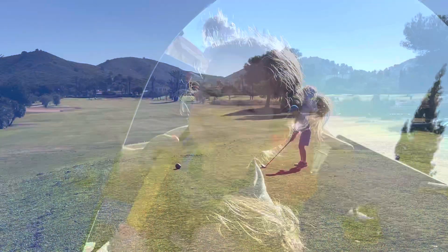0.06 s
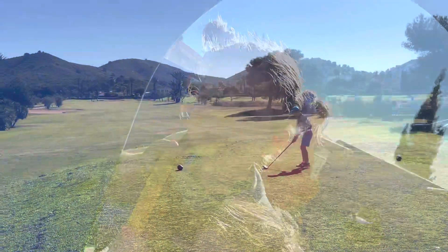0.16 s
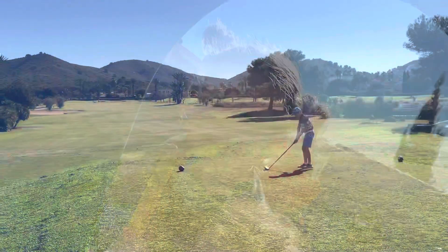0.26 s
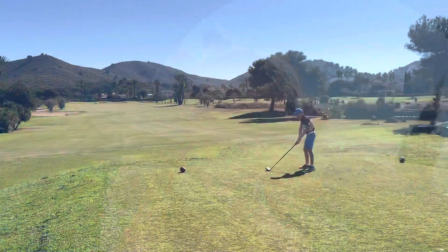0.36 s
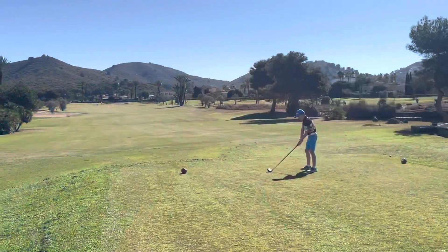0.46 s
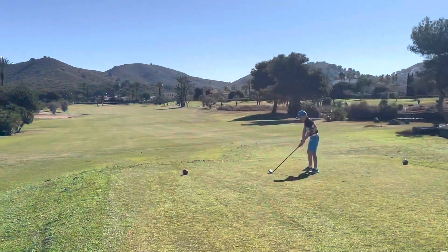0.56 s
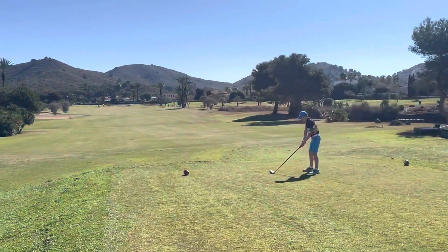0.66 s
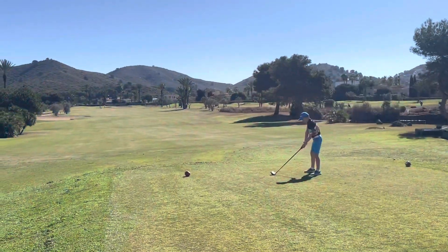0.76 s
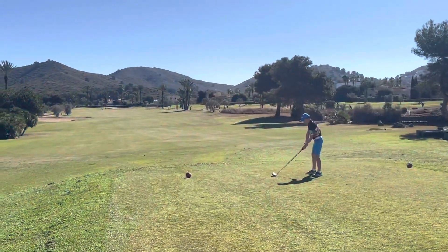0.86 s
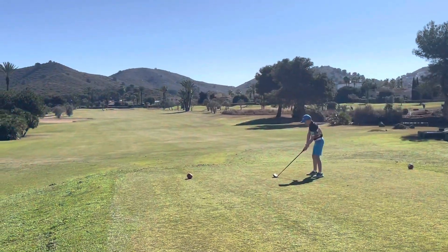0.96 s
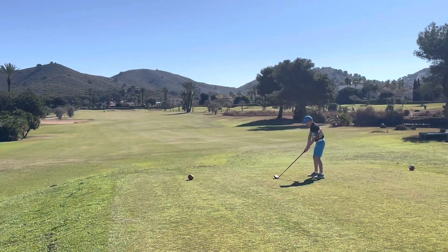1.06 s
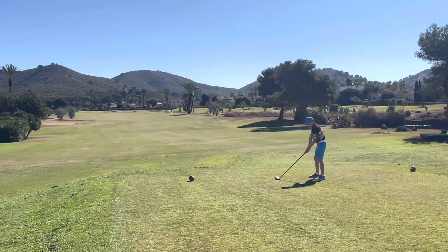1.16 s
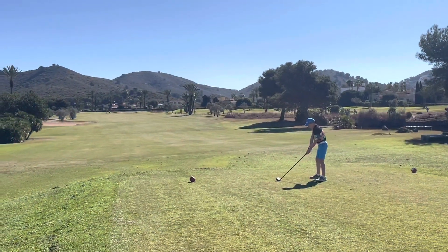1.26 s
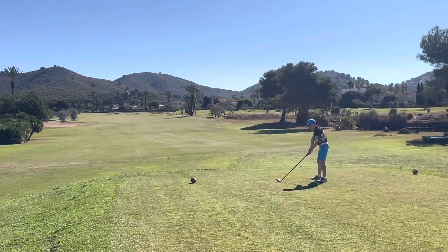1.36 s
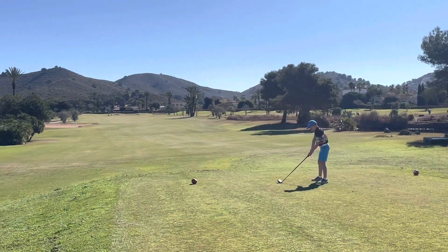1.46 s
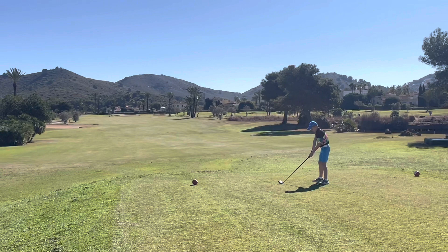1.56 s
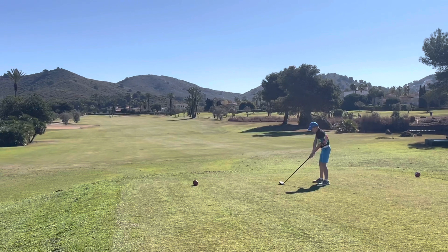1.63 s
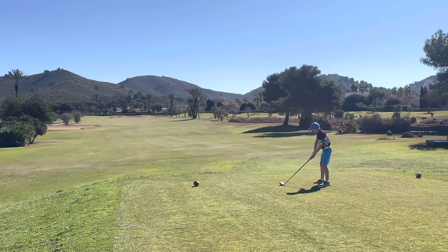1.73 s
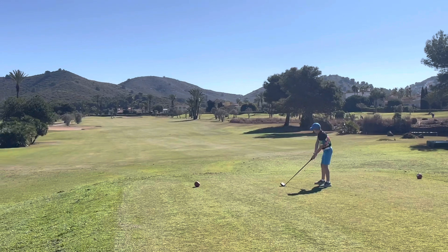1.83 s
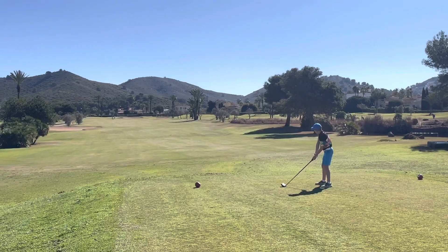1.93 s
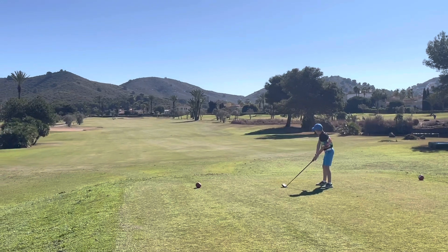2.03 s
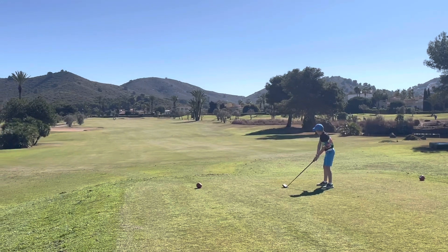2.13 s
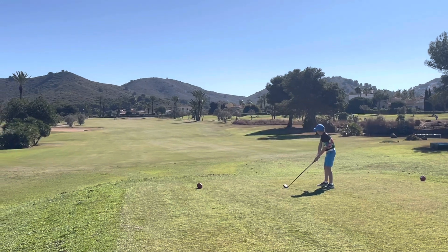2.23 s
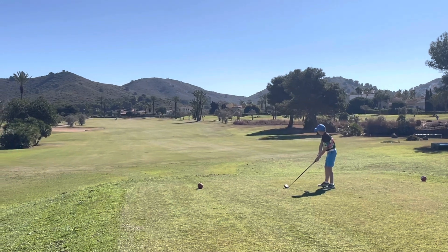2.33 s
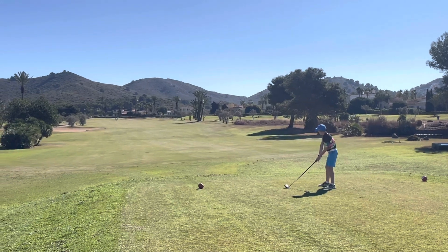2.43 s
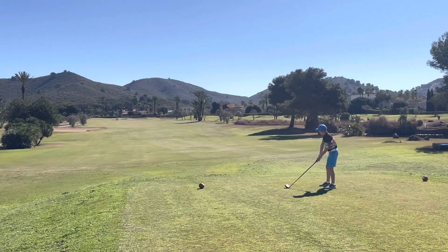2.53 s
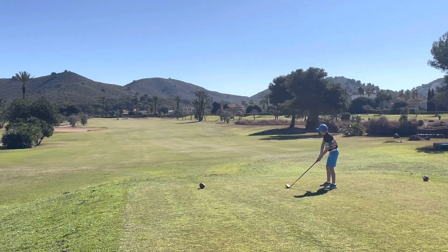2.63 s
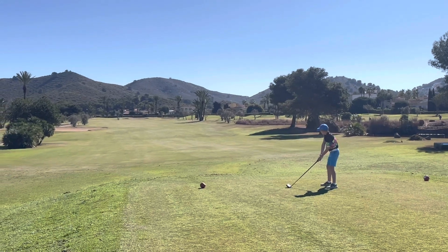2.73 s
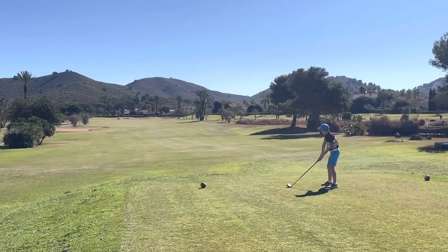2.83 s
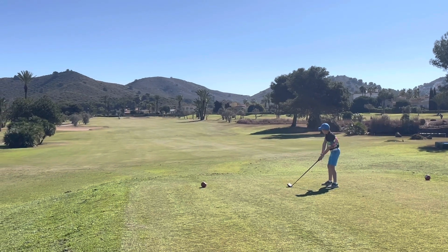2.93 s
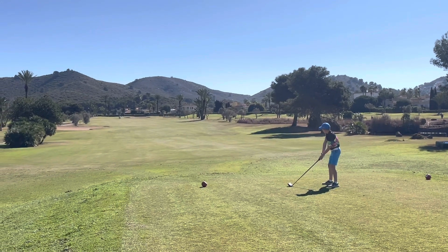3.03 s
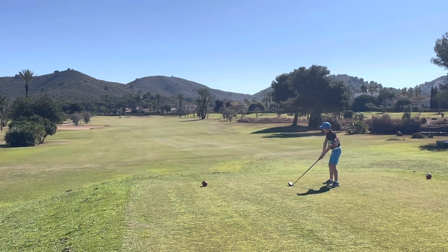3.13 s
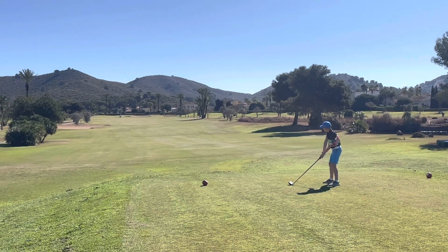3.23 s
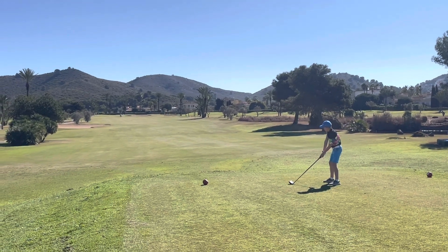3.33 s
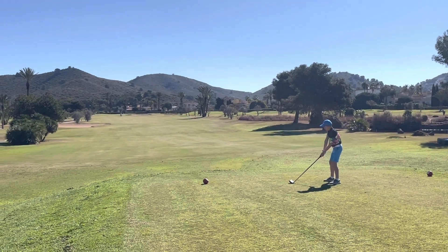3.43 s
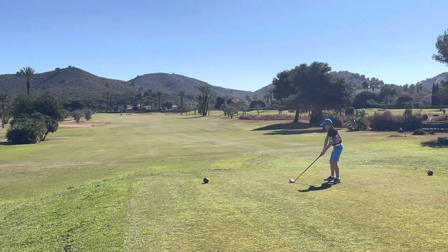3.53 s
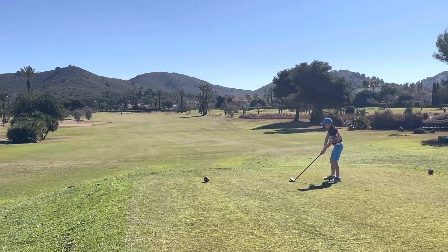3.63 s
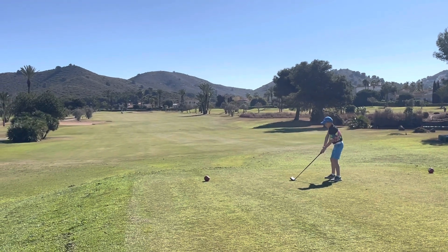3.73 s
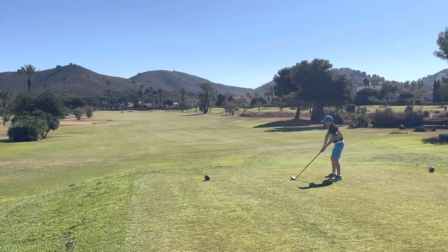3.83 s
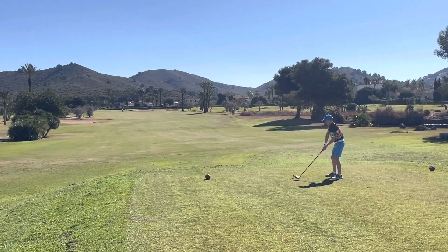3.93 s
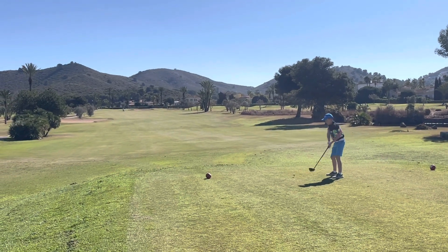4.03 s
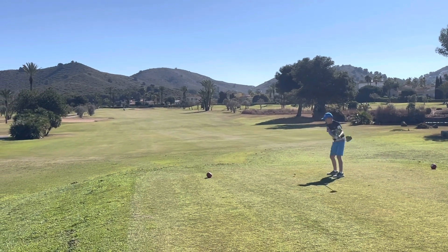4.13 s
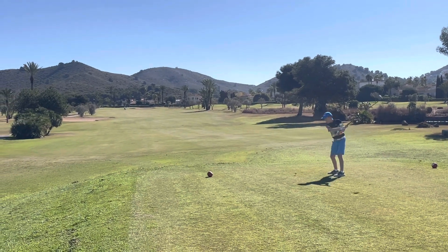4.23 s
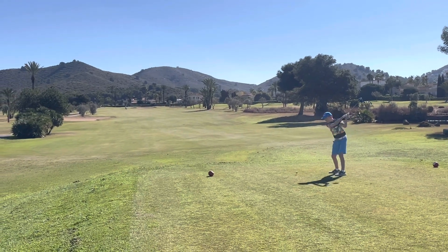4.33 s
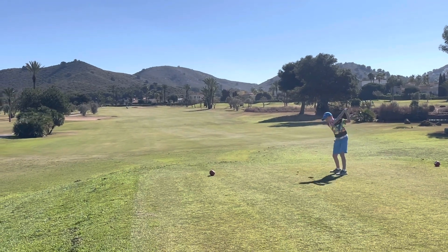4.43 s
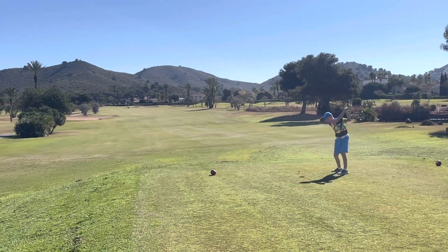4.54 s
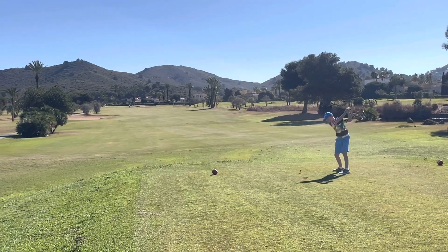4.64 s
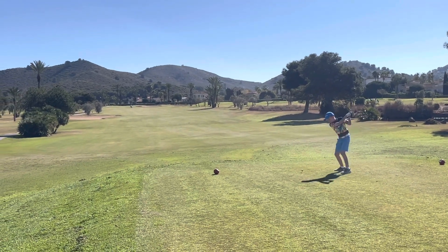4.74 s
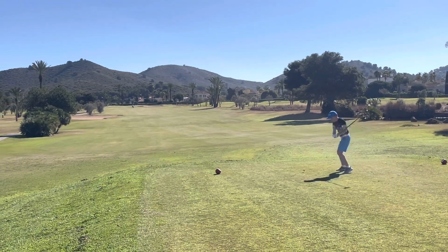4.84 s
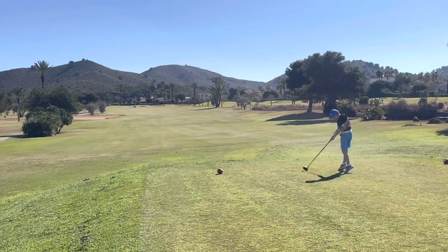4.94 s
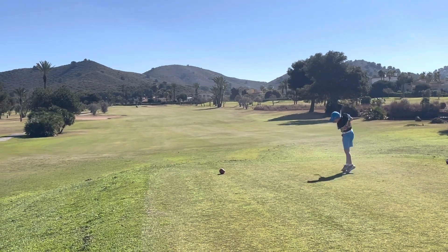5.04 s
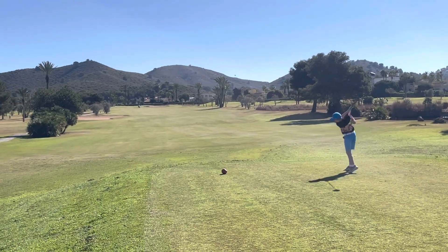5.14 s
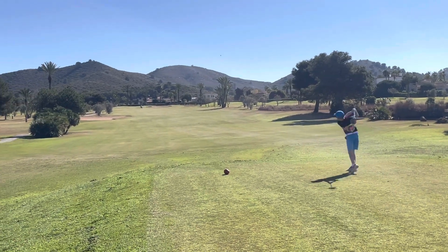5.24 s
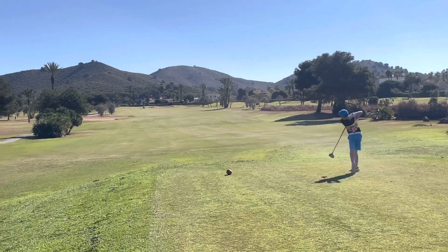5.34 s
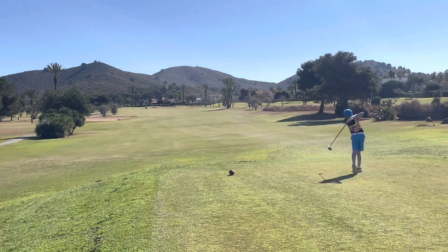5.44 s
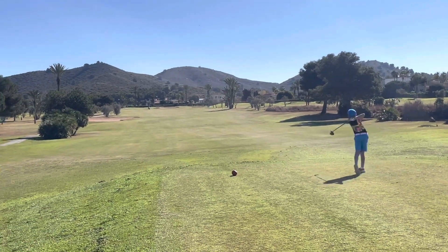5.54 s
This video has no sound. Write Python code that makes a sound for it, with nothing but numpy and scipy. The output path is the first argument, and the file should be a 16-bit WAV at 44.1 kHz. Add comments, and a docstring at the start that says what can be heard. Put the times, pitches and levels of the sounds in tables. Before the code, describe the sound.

On an open golf course, light wind rumbles and softly thumps on the microphone over rustling leaves, a distant mower and a faint machine hum. A nearby songbird whistles a rising, partly trilled tune while small birds chip farther off. Near the end, a metal driver swishes briefly and cracks a ball off the tee, with a short ring and faint echoes. The songbird then whistles again.

```python
"""On an open golf course, a metal driver swishes down and cracks a ball off a tee.
A brief metallic ring follows, and the trees send back echoes. A songbird whistles nearby,
small birds chip farther off, and a distant mower putters and whines over a machine hum.
Light wind buffets the two microphone openings (ports) over the leaves and the hush of the valley."""
import sys
import numpy as np
from scipy import signal
from scipy.fft import rfft, irfft, next_fast_len
from scipy.io import wavfile
from scipy.ndimage import uniform_filter1d, map_coordinates

SR = 44100
rng = np.random.default_rng(int(sys.argv[2]) if len(sys.argv) > 2 else 0)


def log_audio(samples):
    """Write samples as a 16-bit WAV file to the path given in sys.argv[1]."""
    # one column per channel
    frames = np.atleast_2d(samples).T
    # limit to full scale, then quantise
    limited = np.clip(frames, -1, 1)
    pcm = np.round(limited * 32767).astype(np.int16)
    wavfile.write(sys.argv[1], SR, pcm)


N = 246078
TIME = np.arange(N) / SR
SIDES = np.array([[1], [-1]])  # plus for left, minus for right
HIT_S, TICK_S = 4.9631, 4.819

# Face meets ball, then sole meets tee. Each row: seconds after the hit, level in dB, fade in seconds.
# A fade is always the time taken to drop by 60 dB.
TOUCHES = [(0, -14.5, 0.029), (.003, -17, 0.027)]
# Short tones that colour the knock and click of the hit, then the higher metallic ring.
# Each row: pitch in Hz, relative dB, fade in seconds.
HIT_TONES = [(235, -41, .06), (830, -28, .03), (1320, -29, .03), (2010, -28, .016), (2300, -27, .016),
             (2930, -25, .022), (3150, -41, .09), (3950, -21.5, .022), (4060, -41.5, .17),
             (4089, -41.5, .17), (4780, -43, .1), (5330, -33, .025), (5450, -39, .1), (5930, -23, .04),
             (6207, -41, .07), (6930, -23, .055), (7015, -18, .072), (7320, -22.5, .04), (7390, -31, .07),
             (8020, -28, .03), (9500, -29, .04), (10300, -26, .055), (10900, -32, .06), (11300, -27, .06),
             (11790, -32, .05), (12270, -35, .06), (13380, -33, .03), (14400, -37, .02)]
# A tiny metal tick, with the same columns.
TICK_TONES = [(10550, 2, .045), (10720, 0, .045), (12550, -5, .03), (14150, -4, .03), (14500, -5, .03)]
# The tone colour of five noises. Each row: frequency in Hz, relative strength in dB.
CRACK_COLOUR = [(900, -63), (2000, -10.5), (3400, -27.5), (4000, -4.5), (4600, -30), (5900, -10.5),
                (6500, -9.5), (7100, -6.5), (7700, -9), (8100, 1), (8800, -12), (10200, -6.5), (13500, -11),
                (15000, -17), (16400, -43)]
SWISH_COLOUR = [(3000, -32.5), (6000, -3), (8500, -10.5), (11500, -5.5), (14500, -21), (16000, -33.5)]
WIND_COLOUR = [(15, -49.5), (25, -13.5), (54, 0.5), (96, 1.5), (251, -13.5), (317, -19), (400, -20.5),
               (520, -35), (880, -120)]
LEAF_COLOUR = [(3500, -36.5), (5000, -7), (7000, -4), (7800, -10.5), (8500, -2.5), (9000, 4.5),
               (9600, -15.5), (11000, -8), (12500, -12), (13300, -35.5), (16000, -43)]
HUSH_COLOUR = [(120, -43), (250, -11.5), (450, -1), (700, -4), (1100, -9), (1500, -12.5), (2200, -10),
               (3100, -13), (4200, -17.5), (5500, -26), (6500, -60)]
# How the hit reaches the ports. Each row: frequency in Hz, dB by which the left is louder.
HIT_BALANCE = [(100, -15.5), (200, 15.5), (400, 1), (700, -5), (1300, 3), (2400, 0.5)]
# Each row: frequency in Hz, radians by which the left is ahead.
HIT_LEAD = [(200, 0), (500, .3), (750, -1.6), (1150, -.3), (2000, .1), (3300, .7), (5200, .6), (5800, -1.3),
            (7100, -1.2), (8300, -2.7), (10100, -4.2), (12200, -5.5), (14000, -6.3), (16000, -7)]
# Echoes from trees and slopes. Each row: delay in seconds, relative dB, fade in seconds.
ECHOES = [(0.024, -29, .01), (0.033, -28, .008), (0.07, -38, .02), (0.117, -33, .05), (.181, -43, .012),
          (0.203, -42.5, .04), (.24, -45.5, 0.061)]
# What air and foliage give back. Each row: frequency in Hz, gain in dB.
ECHO_COLOUR = [(100, -15.5), (500, -8.5), (1300, -8), (2200, -15), (4100, 2), (5300, 0), (5900, 1.5),
               (6800, -1), (7500, -12), (10000, -13.5), (12000, -8.5), (14000, -39)]
# The songbird's tune. Each row is one note, made of points: time in seconds, pitch in Hz.
NOTE_PITCHES = [
    [(.55, 1980), (.61, 2010)],
    [(.62, 2510), (.65, 2420), (.675, 2140), (.76, 2120)],
    [(.915, 2380), (.931, 2460), (.959, 2704), (.977, 2490), (.995, 2100)],
    [(1.04, 2270), (1.092, 2386), (1.178, 2500), (1.19, 2370)],
    [(1.37, 1920), (1.392, 2030), (1.418, 2131), (1.456, 2135), (1.5, 2050), (1.53, 2090)],
    [(1.555, 2323), (1.569, 2375), (1.635, 2460), (1.669, 2633), (1.7, 2640), (1.73, 2550)],
    [(1.92, 1940), (1.994, 2125), (2.08, 2166)],
    [(2.165, 2310), (2.183, 2374), (2.255, 2443), (2.325, 2630), (2.385, 2650)],
    [(2.52, 2840), (2.578, 2924), (2.592, 2720)],
    [(2.6, 2930), (2.61, 3020), (2.624, 3000), (2.637, 2870), (2.657, 3142), (2.683, 3150), (2.7, 3400),
     (2.72, 3400)],
    [(2.735, 3380), (2.775, 3570)],
    [(2.805, 2820), (2.863, 2860), (2.877, 2945), (2.9, 3100), (2.915, 3060), (3.0, 3400)],
    [(3.035, 3520), (3.09, 3610)],
    [(5.13, 2684), (5.156, 2540), (5.168, 2351)],
    [(5.172, 2520), (5.18, 2530), (5.21, 2530), (5.276, 2915), (5.31, 3170)],
    [(5.31, 3050), (5.342, 2880), (5.428, 2517), (5.526, 2308), (5.58, 2260)],
]
# The same notes. Each row: start dB, place of the peak (0 to 1), peak dB, end dB,
# place where the trill starts (0 to 1), trill pulses a second.
NOTE_SHAPES = [(-64, .6, -63, -59, 1, 0), (-51, 0, -49.5, -72, 0, 55.5), (-58, 0.58, -48.5, -61, 1, 0),
               (-55.5, 0.9, -46.5, -54, 0.9, -3), (-58, 0.2, -61, -65, 0.9, 3),
               (-54, 0.46, -45, -54.5, 0.92, 3), (-64, 0.5, -62, -64, 0.9, 1),
               (-55.5, 0.5, -45.5, -54.5, 0.93, 1), (-56.5, 0.67, -46, -59, 1, 0),
               (-52, 0.3, -52, -57, 0.47, 106.5), (-66, .6, -58, -62, 0.1, 109),
               (-61, 0.11, -49, -66, 0.73, 98), (-66, 0.6, -57.5, -55, 0.13, 98),
               (-54, 0.7, -50.5, -39, 1, 0), (-43.5, 0.62, -47, -70, 1, 0),
               (-56.5, 0.35, -46.5, -60.5, 0.96, 0)]
# Small birds. Each row: start and length in seconds, first, middle and last pitch in Hz,
# level in dB, trill pulses a second.
CHIPS = [(.146, .024, 4000, 5300, 5850, -68, 0), (.168, .024, 5500, 5450, 5200, -59, 0),
         (.19, .016, 5100, 4500, 3800, -67, 0), (.236, .034, 3100, 3750, 4750, -65, 0),
         (.27, .013, 4400, 3950, 3600, -66, 0), (.29, .025, 4500, 4100, 3500, -71, 0),
         (.44, .016, 5000, 5300, 5600, -77, 0), (.578, .014, 4900, 5200, 5500, -77, 0),
         (.648, .016, 4700, 5100, 5600, -74, 0), (.726, .014, 4900, 5300, 5700, -76, 0),
         (.81, .012, 5100, 5300, 5600, -78, 0), (.856, .012, 6250, 6450, 6650, -75, 0),
         (.915, .03, 4000, 3850, 3700, -69, 0), (.286, .03, 3400, 3100, 2750, -59.5, 0),
         (.286, .034, 2300, 2050, 1800, -60, 0), (.512, .022, 3200, 3800, 4400, -68, 0),
         (.533, .022, 4550, 4650, 4600, -70, 0), (.563, .022, 3250, 3350, 3200, -63, 0),
         (.828, .013, 3500, 3700, 3900, -66, 0), (.876, .04, 4850, 4650, 4430, -60, 0),
         (1.226, .02, 5800, 5550, 5400, -67, 0), (1.24, .035, 5500, 5400, 5050, -63, 0),
         (1.31, .04, 4300, 4700, 5200, -70, 0), (2.03, .025, 5000, 4700, 4300, -68, 0),
         (2.362, .085, 6250, 6050, 6250, -64, 85), (2.577, .03, 5700, 6600, 6750, -73, 0),
         (2.662, .012, 5800, 6150, 6500, -73, 0), (2.673, .02, 6580, 6620, 6600, -70, 0),
         (2.72, .026, 4600, 5200, 5800, -74, 0), (2.745, .022, 5800, 5950, 6050, -71, 0),
         (3.59, .1, 7300, 7250, 7250, -76, 70), (4.555, .03, 5900, 5650, 5300, -72, 0),
         (4.6, .02, 4300, 4500, 4900, -73, 0)]
# The steady breeze. Each row: time in seconds, level in dB.
BREEZE = [(0.0, -53.5), (0.15, -54), (1.96, -51.5), (2.5, -54), (4.41, -52.5), (4.77, -54.5), (5.58, -45)]
# Gusts. Each row: time in seconds, peak dB, half length in seconds, dB more on the left.
GUSTS = [(.01, -54, 0.036, -1), (0.234, -51.5, 0.04, -4), (0.44, -55, 0.011, -4), (0.596, -49.5, 0.055, -2),
         (0.718, -51.5, 0.053, -6), (0.861, -47.5, 0.012, -1), (0.957, -52, 0.017, -4), (1.1, -50, 0.12, 3),
         (1.256, -49, 0.047, 3), (1.498, -48, 0.0088, 16), (1.558, -50, 0.022, -8), (1.72, -59, .03, 1),
         (1.88, -49.5, 0.056, -3), (2.04, -49.5, 0.03, -2), (2.196, -44, 0.02, -2),
         (2.494, -51.5, 0.12, -1), (2.827, -48, 0.041, -3), (3.06, -50.5, 0.045, 2),
         (3.236, -49.5, 0.092, 2.5), (3.346, -43, 0.026, 2.5), (3.613, -46, 0.013, 1),
         (3.779, -49, 0.018, 3), (3.89, -48.5, 0.069, -1), (4.05, -48, 0.094, 4), (4.308, -45, 0.029, 2),
         (4.488, -45, 0.072, -1), (4.683, -46.5, 0.023, 1), (4.773, -45, 0.012, -4), (4.99, -49, 0.083, -4),
         (5.18, -53, 0.018, 0.5), (5.289, -49, 0.028, 5), (5.393, -53, 0.048, 5), (5.507, -56, 0.045, 1)]
# Single swirls of air that thump a port.
# Each row: time in seconds, peak dB, dB more on the left, pitch in Hz, half length in seconds.
THUMPS = [(0.445, -43, 1, 70, .01), (0.583, -41, 2, 80, 0.0075), (0.593, -48, -1, 203, 0.0025),
          (0.839, -45.5, 1, 203, 0.0051), (.853, -39, -1, 72, 0.0075), (.955, -46, -1, 75, .016),
          (1.072, -41.5, 0, 68, .014), (1.109, -45, -1, 203, 0.0039), (1.13, -43, -7, 62, 0.0086),
          (1.166, -42.5, -1, 62, 0.011), (1.223, -42, -.5, 203, 0.0029), (1.232, -44, 0, 85, 0.017),
          (1.72, -50, 1.5, 203, 0.0041), (3.243, -42.5, 4, 96.5, 0.027), (3.347, -41.5, -1, 68, 0.021),
          (3.353, -41, -3, 203, 0.003), (4.104, -41.5, 0, 203, 0.0049), (4.311, -42, -3, 99, 0.014),
          (4.315, -41.5, -1, 203, .0034), (4.627, -44.5, -2, 203, 0.0039), (5.038, -42, -2, 150, 0.0062),
          (5.085, -45, -3, 203, 0.0049), (5.289, -48, 3, 96, 0.019)]
# Far sounds. Each row: time in seconds, then dB of hush, putter, leaves, low hum and high hum.
FAR_LEVELS = [(0, -64.5, -72, -83, -72.5, -80), (.6, -60.5, -73.5, -79.5, -72, -93),
              (1.3, -60.5, -68.5, -76.5, -72.5, -87), (2, -58.5, -67, -73.5, -71, -89),
              (2.6, -58.5, -75, -75.5, -67, -75), (3.7, -58, -72.5, -76, -68.5, -78),
              (4.85, -57, -72, -76.5, -68.5, -71.5), (5.05, -56, -65, -73.5, -73.5, -68),
              (5.58, -56, -69, -72, -61.5, -63.5)]
# Where the mower's casing, its blades and a far machine's hum ring.
# Each row: pitch in Hz, width in Hz, relative dB.
CASING_BANDS = [(1769, 63, 4), (907, 280, -16.5)]
BLADE_BANDS = [(2680, 240, -3), (3514, 200, -1.5), (3793, 100, 0.5)]
LOW_HUM_BANDS = [(546.4, 43, -2.5), (518, 93, -5)]
HIGH_HUM_BANDS = [(745, 30, -10.5), (802, 25, 0), (860, 110, -3.5), (1040, 28, -8), (1100, 80, -3.5)]
# Steady tones inside the hum. Each row: pitch in Hz, dB relative to that part of the hum.
LOW_HUM_TONES = [(554, -3), (495, -9), (673, -12)]
HIGH_HUM_TONES = [(716, -9), (775, -7), (866, -9), (990, -6), (1039, -10), (1063, -10)]
# Sound from all around. Each row: frequency in Hz, how alike the ports are (1 same, -1 opposite).
LIKENESS = [(60, 0.37), (130, 0.23), (290, 0.86), (640, -0.33), (1300, 0.38), (1900, 0.99), (2400, 1),
            (3500, 0.79), (5000, 0.79), (7000, 0.2), (8500, -1.165), (11000, -0.21), (15000, 0.93)]
# Each row: frequency in Hz, dB by which the left is louder.
WIDE_BALANCE = [(160, 1), (270, 0), (450, 6), (740, 10.5), (1220, 10), (2010, -0.5), (3330, 0.4),
                (15000, 0)]


def strike():
    """Club, ball and tee touch with a crack and a thud, then a metallic ring lingers."""
    after = np.clip(TIME - HIT_S, 0, 1)
    blow = crack(after) + thud(after) + ring(HIT_TONES, HIT_S, attack_s=.0002, waver_db=3.5)
    ports = lambda hz: amp(along(HIT_BALANCE, hz) / 2) * np.exp(.5j * along(HIT_LEAD, hz))
    return filtered(blow, lambda hz: ports(hz) ** SIDES)


def crack(after):
    """A short, level burst of noise stops abruptly; a gritty rattle dies away after it."""
    burst_s, low_hz, high_hz = .0046, 4000, 12100
    grit = unit(filtered(rng.standard_normal(N), lambda hz: amp(along(CRACK_COLOUR, hz))))
    touches = sum((after > s) * amp(db - 60 * np.abs(after - s) / fade) for s, db, fade in TOUCHES)
    touches *= np.clip(1 - (after - burst_s) / .0004, 0, 1)
    rattle = filtered(grit, lambda hz: cut_lows(hz, low_hz) / (1 + (hz / high_hz) ** 8))
    return touches * grit + dying(after, db=-20, fade_s=.1) * rattle


def thud(after):
    """A knock drops fast in pitch; its higher part bounces once off the turf."""
    turns, head_start_s, bounce_s = 1.35, .0007, .00213
    phase = 2 * np.pi * turns * np.log(.85 + after / head_start_s)
    knock = dying(after, db=-18.5, fade_s=.05) * np.cos(phase)
    bounce = lambda hz: amp(-5) / (1 + (520 / (hz + 1)) ** 6) * np.exp(-2j * np.pi * hz * bounce_s)
    return filtered(knock, lambda hz: cut_lows(hz, below_hz=172) * (1 + bounce(hz)))


def swing():
    """Metal ticks at the top of the swing, then the head cuts the air, louder as it speeds up."""
    peak_db, rise_db_per_s = -60.5, 300
    swell = (TIME < HIT_S) * amp(peak_db + rise_db_per_s * np.minimum(TIME - HIT_S, 0))
    swish = swell * rush(SWISH_COLOUR, patchy_db=-7.5)
    return swish + amp(-67) * ring(TICK_TONES, TICK_S, attack_s=.003, waver_db=3)


def trees(x):
    """Trees, slopes and ground scatter sound back; each echo swells quickly and dies slowly."""
    t, tail = TIME[:SR // 2], 0
    ground = (.0066, -22.5, .54)  # one more echo, with a long fade
    for s, db, fade in ECHOES + [ground]:
        shape = amp(-60 * np.abs(t - s) / np.where(t > s, fade, .2 * min(fade, .05)))
        tail = tail + amp(db) * shape / np.linalg.norm(shape)
    echoes = signal.fftconvolve(x, tail * rng.standard_normal((2, len(t))), axes=1)[:, :N]
    return filtered(echoes, lambda hz: amp(along(ECHO_COLOUR, hz)))


def songbird():
    """Pure whistles with a slight flutter and a faint octave above, some ending in a trill."""
    edge_s, trill_grows_s, left_db = .007, .015, .5
    out, flutter, uneven = np.zeros(N), wobble(70), 1 + .11 * wobble(30)
    for tune, (start_db, top, peak_db, end_db, trill_at, rate) in zip(NOTE_PITCHES, NOTE_SHAPES):
        s, length = tune[0][0], tune[-1][0] - tune[0][0]
        at = slice(round(s * SR), round((s + length) * SR))
        t = TIME[at] - s
        progress, top = t / length, np.clip(top, .05, .95)
        rise = (start_db - peak_db) * np.abs(1 - progress / top) ** 1.88
        fall = (end_db - peak_db) * np.abs((progress - top) / (1 - top)) ** 1.88
        trill = .92 * np.clip((t - trill_at * length) / trill_grows_s, 0, 1)
        db = peak_db + np.where(progress < top, rise, fall)
        db += 1.3 * trill + (1.5 * trill - .52) * flutter[at]
        beat = np.cos(phase_of(rate * uneven[at]))
        phase = phase_of(curves(tune)[0][at] * (1 + .003 * flutter[at] + .04 * trill * beat))
        edges = np.clip(np.minimum(t, length - t) / edge_s, 0, 1)
        pulses = 1 - trill * (1 - beat) / 2
        out[at] += edges * pulses * amp(db) * (np.sin(phase) + amp(-36) * np.sin(2 * phase))
    return out * amp(SIDES * left_db / 2)


def small_birds():
    """Short sliding chips, roughened by distance; the faintest come at random."""
    out, rough = np.zeros(N), wobble(900)
    faint = [(when * (TIME[-1] - .1), .01 + .03 * long, hz, 1.04 * hz, 1.06 * hz, -81, 0)
             for when, long, hz in rng.uniform((0, 0, 4000), (1, 1, 7000), (30, 3))]
    for s, length, start_hz, mid_hz, end_hz, db, trill_hz in CHIPS + faint:
        at = slice(round(s * SR), round((s + length) * SR))
        u = np.clip((TIME[at] - s) / length, 0, 1)  # progress through the chip
        hz = start_hz * (1 - u) * (1 - 2 * u) + 4 * mid_hz * u * (1 - u) + end_hz * u * (2 * u - 1)
        trill = np.pi * trill_hz * length * u
        hz *= 1 - .08 * np.sin(2 * trill) + .009 * rough[at]  # each trill pulse sweeps down
        shape = np.sqrt(np.sin(np.pi * u)) * np.cos(trill) ** 4
        out[at] += amp(db + 2.5 * rough[::-1][at]) * shape * np.sin(phase_of(hz))
    return out * amp(-.6 * SIDES)  # a little to the right


def branches(x, db=-6.5, fade_s=.14):
    """Branches around the birds blur each note with a short, dense echo."""
    tail = amp(-60 * TIME[:SR // 8] / fade_s) * rng.standard_normal((2, SR // 8))
    return amp(db) * signal.fftconvolve(x, tail / np.linalg.norm(tail[0]), axes=1)[:, :N]


def wind():
    """Swirling air rumbles on the ports and swells in gusts; the strongest swirls thump."""
    power = amp(2 * curves(BREEZE)[0])
    for s, db, half, left_db in GUSTS:
        power = power + amp(2 * db + SIDES * left_db) * np.exp(-2 * ((TIME - s) / half) ** 2)
    lumps = amp(.88 * wobble(21.98) + 1.1 * np.array([wobble(14), wobble(9)]))
    out = np.sqrt(power) * unit(lumps * rush(WIND_COLOUR, patchy_db=0))
    for s, db, left_db, hz, half in THUMPS:
        t, phase = TIME - s, 2 * np.pi * rng.random()
        out += amp(db + SIDES * left_db / 2) * np.exp(-(t / half) ** 2) * np.sin(2 * np.pi * hz * t + phase)
    return out


def mower_engine(level_db, firing_hz=58.1):
    """Uneven firings puff and ring the casing; every second one is stronger."""
    count = np.arange(int(firing_hz * N / SR))
    at = ((count + .3 + .02 * rng.standard_normal(len(count))) / firing_hz * SR).astype(int)
    firings = np.zeros(N)
    firings[np.clip(at, 0, N - 1)] = amp(-8 * (count % 2) + 1.5 * rng.standard_normal(len(count)))
    puffs = signal.fftconvolve(firings, amp(-60 * TIME[:900] / .03))[:N] * rng.standard_normal((2, N))
    casing = lambda hz: resonances(CASING_BANDS, hz) / (1 + (hz / 5000) ** 4)
    return amp(level_db + .886 * wobble(1.5)) * spread(puffs, casing)


def mower_blades(peak_s=1.35, peak_db=-64.5):
    """The blades' whine comes up quickly, then slowly recedes."""
    db_per_s = np.where(TIME < peak_s, 41, .4)
    db = peak_db - db_per_s * np.abs(TIME - peak_s)
    return amp(db + .96 * wobble(5.74)) * ringing_noise(BLADE_BANDS)


def machine_hum(low_db, high_db):
    """A far machine hums: narrow bands of noise with slightly unsteady tones inside."""
    out = amp(low_db + .46 * wobble(2.1)) * ringing_noise(LOW_HUM_BANDS)
    out += amp(high_db + .46 * wobble(2.1)) * ringing_noise(HIGH_HUM_BANDS)
    for tones, level_db in [(LOW_HUM_TONES, low_db), (HIGH_HUM_TONES, high_db)]:
        for hz, db in tones:
            phase = phase_of(hz * (1 + .002 * wobble(4)))
            gain = amp(level_db + db + 1.5 * wobble(4) + SIDES * along(WIDE_BALANCE, hz) / 2)
            out += gain * np.sqrt(2) * np.sin(phase)
    return out


def valley():
    """Far machines, a soft hush and the high rustle of leaves."""
    hush_db, putter_db, leaves_db, low_db, high_db = curves(FAR_LEVELS)
    machines = mower_engine(putter_db) + mower_blades() + machine_hum(low_db, high_db)
    hush = amp(hush_db + 1.7 * wobble(5.244)) * rush(HUSH_COLOUR, patchy_db=1)
    leaves = amp(leaves_db + wobble(4.9)) * rush(LEAF_COLOUR, patchy_db=3)
    return machines + hush + leaves


def ring(tones, start_s, attack_s, waver_db):
    """Tones start together and die away, each wavering a little."""
    out, at = np.zeros(N), round(start_s * SR)
    t = TIME[at:] - TIME[at]
    for hz, db, fade in tones:
        waver = map_coordinates(rng.standard_normal(100), [t * 150])
        shape = amp(db + waver_db * waver - 60 * t / fade) * (1 - np.exp(-t / attack_s))
        out[at:] += shape * np.sin(2 * np.pi * hz * t + .241 * waver)
    return out


def rush(colour, patchy_db):
    """Wide noise with random louder and softer patches."""
    spectra = signal.stft(rng.standard_normal((2, N)), nperseg=512)[2]
    patches = uniform_filter1d(uniform_filter1d(rng.standard_normal(spectra.shape[1:]), 6, 0), 14, 1)
    pair = signal.istft(spectra * amp(patchy_db * unit(patches)), nperseg=512)[1][:, :N]
    return spread(pair, lambda hz: amp(along(colour, hz)))


def ringing_noise(bands):
    """Wide noise sent twice through ringing bands."""
    return spread(rng.standard_normal((2, N)), lambda hz: resonances(bands, hz) ** 2)


def spread(pair, gain):
    """Colour and mix two unrelated signals so they seem to come from all around, at level 1."""
    angle = lambda hz: np.arccos(np.clip(along(LIKENESS, hz), -1, 1)) / 2
    mid, side = filtered(pair, lambda hz: gain(hz) * [np.cos(angle(hz)), np.sin(angle(hz))])
    tilt = lambda hz: amp(along(WIDE_BALANCE, hz) / 2) ** SIDES
    return unit(filtered(np.array([mid + side, mid - side]), tilt))


def resonances(bands, hz):
    """How a body that rings in these bands answers each frequency."""
    return sum((-1) ** k * amp(db) * 1j * hz * width / (pitch ** 2 - hz ** 2 + 1j * hz * width)
               for k, (pitch, width, db) in enumerate(bands))


def filtered(x, response):
    """Multiply each frequency in x by response(hz)."""
    size = next_fast_len(N + SR // 2)
    return irfft(rfft(x, size) * response(np.fft.rfftfreq(size, 1 / SR)), size)[..., :N]


def cut_lows(hz, below_hz):
    return hz ** 4 / (hz ** 4 + below_hz ** 4)


def dying(t, db, fade_s):
    return (t > 0) * amp(db - 60 * t / fade_s)


def phase_of(hz):
    return 2 * np.pi * np.cumsum(hz) / SR


def wobble(rate):
    """A smooth curve through this many random points a second."""
    return map_coordinates(rng.standard_normal(int(N * rate / SR) + 4), [TIME * rate])


def curves(rows):
    """One value per sample for each column after the time."""
    s, *columns = np.transpose(rows)
    return [np.interp(TIME, s, column) for column in columns]


def along(points, hz):
    """Read between the rows of a frequency table, on a log scale."""
    freqs, values = np.transpose(points)
    return np.interp(np.log(hz + 1), np.log(freqs + 1), values)


def amp(db):
    return 10 ** (np.asarray(db) / 20)


def unit(x):
    return x / np.sqrt(np.mean(x ** 2) + 1e-20)


def scene():
    """The shot and the birds with their echoes, over the valley and the wind."""
    blow = strike()
    birds = songbird() + small_birds()
    echoes = trees(blow) + branches(birds) + amp(4) * trees(birds)
    return blow + birds + echoes + swing() + valley() + wind()


def record(dry, top_hz=16550):
    """The microphone keeps nothing above its highest frequency."""
    return filtered(dry, lambda hz: np.clip((top_hz - hz) / 300, 0, 1) ** 2)


dry = scene()
out = record(dry)
log_audio(out)
```